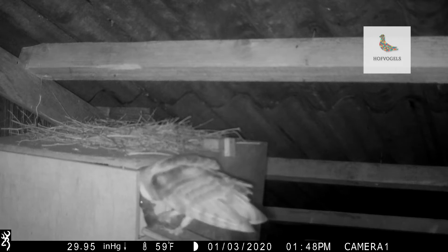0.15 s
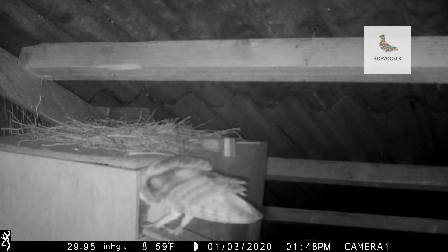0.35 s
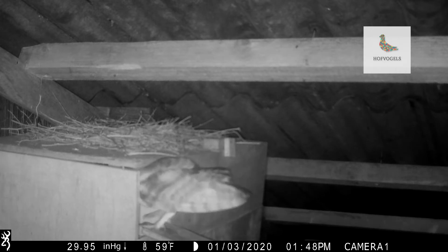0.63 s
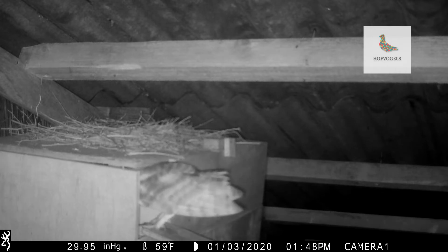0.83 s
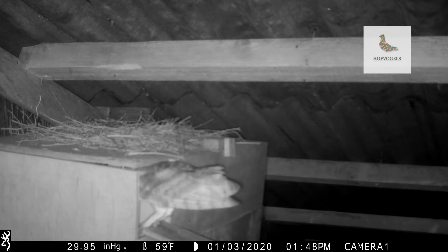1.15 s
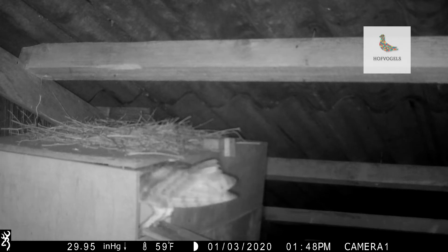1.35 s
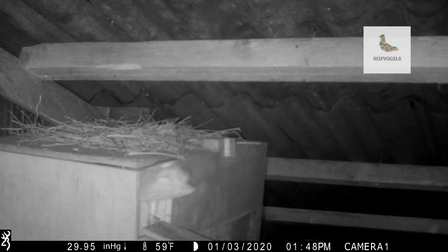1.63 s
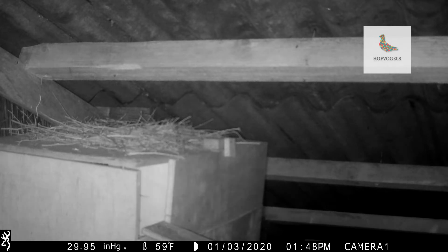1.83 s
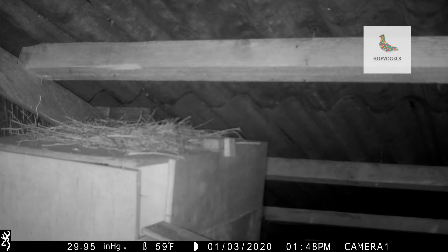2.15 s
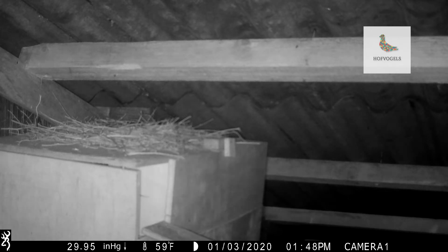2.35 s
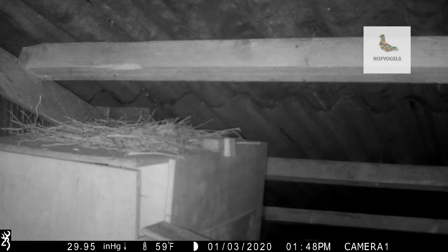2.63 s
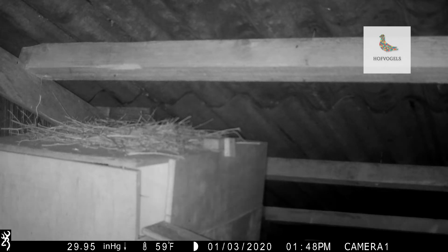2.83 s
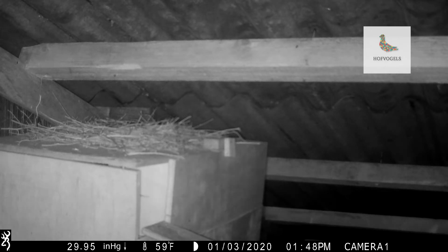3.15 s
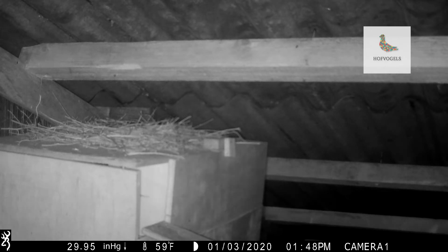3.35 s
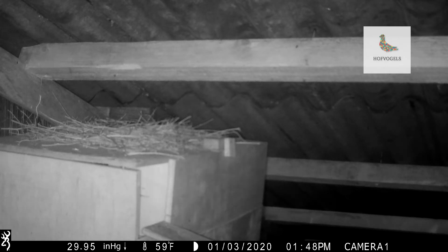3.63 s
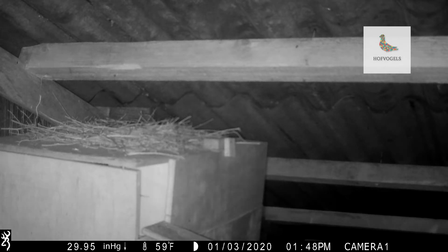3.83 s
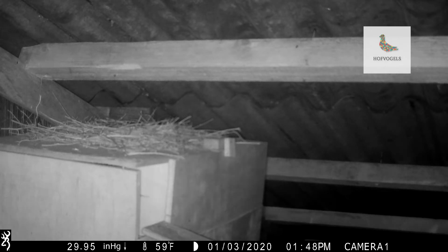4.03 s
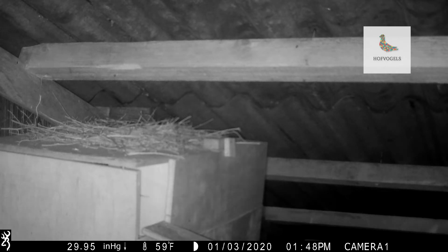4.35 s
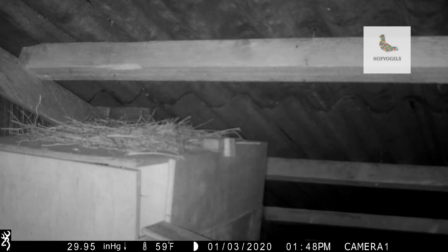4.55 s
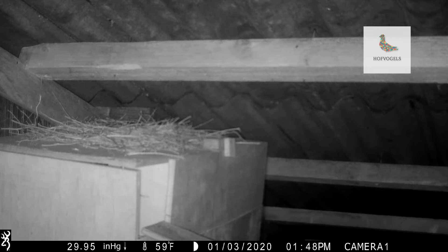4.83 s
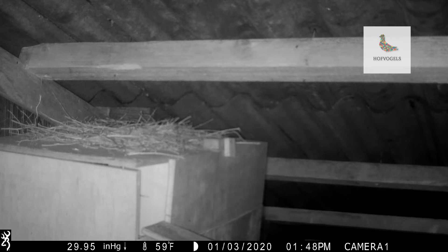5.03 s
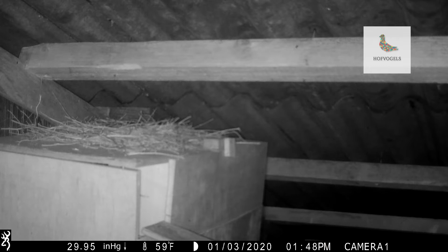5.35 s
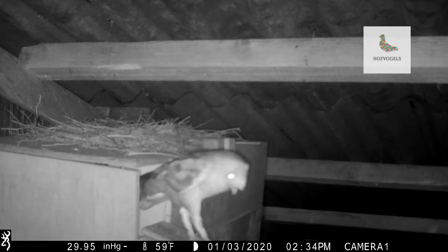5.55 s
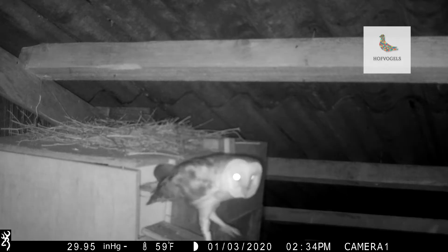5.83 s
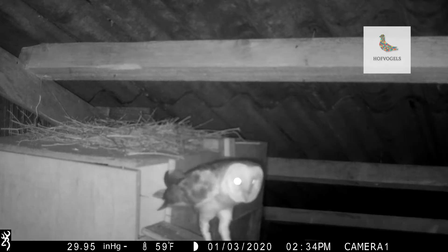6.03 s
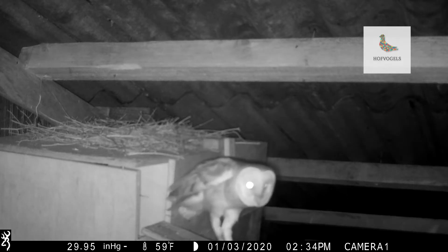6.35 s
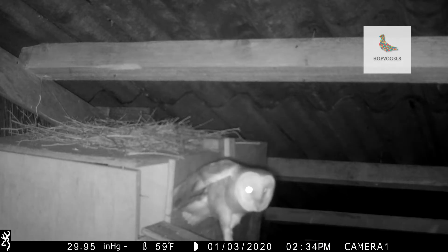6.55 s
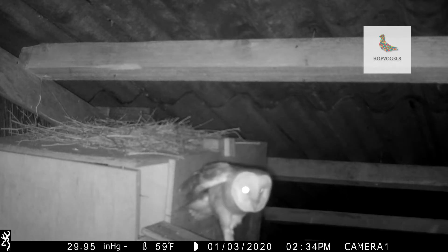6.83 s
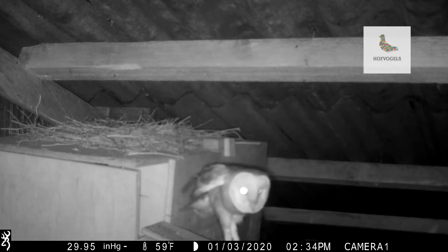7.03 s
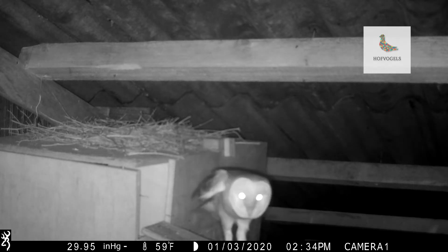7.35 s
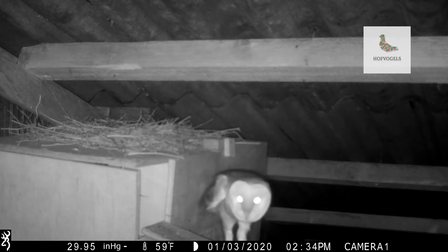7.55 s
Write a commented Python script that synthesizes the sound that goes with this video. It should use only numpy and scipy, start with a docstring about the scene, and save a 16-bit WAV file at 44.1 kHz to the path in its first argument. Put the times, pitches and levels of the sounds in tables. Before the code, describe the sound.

A quiet wooden loft with short, scattered echoes, picked up by a small microphone with steady muffled noise, a very faint high electronic whine and slight buzz. At 0.1 s a barn owl gives a soft, harsh hiss that swells for 0.6 s and stops fast. A much louder, ringing, raspy screech follows at 1.1 s, with a faint talon scratch; a weaker hiss overlaps its end at 1.6 s. Around 1.9 s feet thump lightly on hollow boards. The loudest and longest screech runs from 2.6 to 3.3 s, followed by a brief hiss at 3.35 s and a rougher screech at 3.8 s. Another strong screech starts at 4.9 s and runs into a second bird's at 5.5 s, where a soft pop and one hard, dry bill snap occur. Faint hisses follow at 5.9 and 6.2 s, small scratches near 6.5 s, and a final quieter screech at 7 s.

```python
"""Barn owls in a nest box

Barn owls hiss and screech in a wooden box in a quiet loft at night, at times two at once.
Each screech is noise shaped like air in a throat; most swell slowly, and all stop fast.
Feet thump on ringing boards, a bill snaps and talons scratch, all with echoes of the loft.
Behind them are a soft pop, steady microphone noise and the thin whine and buzz of the camera."""
import sys
import numpy as np
from scipy import signal
from scipy.fft import rfft, irfft
from scipy.io import wavfile

SR = 44100
rng = np.random.default_rng(int(sys.argv[2]) if len(sys.argv) > 2 else 0)


def master_out(mix):
    """Clip the mix to full scale and print it as 16-bit PCM to the path in sys.argv[1]."""
    frames = np.transpose(np.atleast_2d(mix))
    ceiling = np.clip(frames, -1, 1)
    pcm = np.round(ceiling * 32767).astype(np.int16)
    wavfile.write(sys.argv[1], SR, pcm)


N = 339129  # length [samples]

# how each screech is pushed out; the last five run into another one:
# (start [s], length [s], attack [s], time to the crest [s], level at the crest [dB],
#  swell from start to crest [dB], release [s], share of the lower resonances at the crest [dB],
#  rise of that share for each dB of effort under the crest [dB], rush of air [dB],
#  extra treble in the rush [dB])
SCREECHES = [(0.139, 0.64, 0.062, 0.71, -50.5, 12.5, .11, -5, 0.17, -9, 4.5),
             (1.088, 0.61, 0.028, 0.44, -41, 16, 0.16, -10.5, 0.307, -15, 2),
             (2.56, 0.763, 0.038, 0.54, -40, 16.5, 0.11, -6, 0.18, -15.5, 1.5),
             (3.786, 0.62, 0.027, 0.45, -48, 14.5, 0.097, -3.5, 0.2535, -5.5, 1.5),
             (4.87, 0.59, 0.043, .48, -45.5, 16, 0.018, -4.5, 0, -10, 2.5),
             (6.97, 0.66, 0.094, .43, -50, 12, 0.095, -5.5, 0.38, -11.5, 3.5),
             (1.574, 0.38, .025, 0.18, -52, -1.3, .1, -0.5, 0, -10.5, 2),
             (3.352, 0.21, .025, 0.16, -52, -0.5, 0.077, -4, 0, -14, 7),
             (5.464, 0.46, .01, 0.35, -45, 7, 0.12, -6, 0.3658, -10, -1),
             (5.94, 0.28, 0.023, .1, -61.5, -0.1, 0.17, 1.5, 0, -7, 4),
             (6.219, 0.36, .05, .3, -57.5, 3.5, 0.058, -2.5, 0.17, -6, -1)]
# resonances of throat and box, one list a screech, as each bird sits and gapes differently:
# (frequency [Hz], width [Hz], level [dB])
THROAT_RESONANCES = [
    [(2520, 60, -3), (2950, 120, -4), (3660, 120, 1.5), (3990, 20, 6.5), (4170, 51, 0.5), (4520, 42, 1.5),
     (4740, 50, -2), (5310, 280, -13.5)],
    [(2210, 28, -19), (2400, 320, -10), (2730, 24, -5.5), (3180, 46, -6.5), (3667, 130, 1), (4056, 41, 1),
     (4270, 49, -21)],
    [(2376, 210, -5.5), (2890, 50, -18), (3260, 15, -9), (3710, 120, -3), (4310, 95, -13.5),
     (5230, 27, -27), (5960, 190, -38)],
    [(1464, 48, 1), (2020, 240, 1), (2324, 25, 2.5), (2700, 59, -5), (2880, 150, -3.5), (3200, 21, -17),
     (3540, 85, -2), (3830, 28, -15), (4250, 18, 0), (4430, 97, -2), (4760, 42, -4.5), (5200, 280, -16)],
    [(1454, 32, -11), (2365, 200, -2), (3110, 110, -21), (3600, 23, -12), (3850, 120, 1), (4530, 28, -10),
     (5240, 66, -18), (5100, 40, -13)],
    [(2080, 41, -10), (2374, 99, -3), (2910, 110, -10), (3810, 170, 0), (4330, 100, -1), (4580, 32, -1),
     (4870, 40, -14), (5390, 68, -17)],
    [(1430, 37, -6), (2020, 140, -8.5), (2360, 100, -3), (2680, 37, -5), (3010, 74, -3), (4040, 45, -4),
     (4230, 40, -6), (4680, 65, -16)],
    [(2070, 110, -10), (2364, 62, -8), (3120, 34, -8), (3585, 37, 2), (3790, 47, 0), (4100, 64, -4),
     (4300, 76, -14)],
    [(2070, 91, -11), (2300, 82, -6), (2630, 19, -4), (2900, 85, -8.5), (3040, 57, -8), (3730, 57, -1.5),
     (4100, 95, -1), (5100, 49, -24), (5400, 130, -22)],
    [(1300, 100, -4), (2470, 45, -2.5), (2740, 29, -2), (3250, 31, -1), (3460, 33, 3), (3800, 63, 1),
     (4270, 42, -6)],
    [(2460, 77, 0), (2860, 23, -1), (3480, 26, 4), (3740, 130, 0), (4360, 36, -5)],
]


def owls():
    """All screeches, each sounding through its own resonances of throat and box."""
    out = np.zeros(N)
    for row, throat in zip(SCREECHES, THROAT_RESONANCES):
        start, sound = screech(row, throat)
        add(out, start, sound)
    return out


# broad rush of air under the resonances of every screech: (frequency [Hz], level [dB])
AIR_RUSH = [(600, -28), (1200, -12.5), (1450, -7.5), (1750, -10.5), (2350, -4), (2900, -4.5), (3700, 3.5),
            (4400, 1.5), (5150, -16.5), (5450, -20), (6000, -27.5), (6800, -35.5), (9900, -31),
            (11200, -47.5), (14500, -54)]


def screech(row, throat):
    """Turbulent air sounds the throat; resonances stand out as effort grows; the jet rasps and trembles."""
    split_hz, treble_hz = 2900, 5000  # lower from upper resonances; start of the extra treble
    slack = 0.1  # power of the resonances in a slack throat, as a share of a tense one
    focus = 0.29  # dB of tension lost for each dB of effort under its highest
    rasp, rasp_hz = 0.033, 190  # depth and speed of the rough flutter
    tremor_db, tremor_hz = 0.06, 28  # depth and speed of the slower tremble
    (start, length, attack_s, crest_s, crest_db, swell_db, release_s,
     share_db, lead, rush_db, treble_db) = row

    t, effort_db = effort(length, crest_s, swell_db, release_s)
    lower_db = share_db - lead * effort_db
    hz = np.fft.rfftfreq(len(t), 1 / SR)

    # steep-sided resonances stand on the broad rush
    peaks = sum(amp(db) ** 2 / (1 + ((hz - f) / width) ** 2) ** 2 for f, width, db in throat)
    rush_gain = amp(rush_db + treble_db * (hz > treble_hz))
    rush = rush_gain * spectrum(AIR_RUSH, hz) * box_echoes(hz)

    def jet(colour):
        """Air noise in the upper resonances, plus a changing share of the lower ones."""
        upper = noise(len(t), lambda hz: colour * (hz >= split_hz))
        lower = noise(len(t), lambda hz: colour * (hz < split_hz))
        return upper + amp(lower_db) * lower

    # a slack throat gives a plain hiss, a tense one a ringing screech
    tension = np.clip(amp(focus * (effort_db - effort_db.max())), 0, 1)
    ringing = jet(np.sqrt(peaks + rush ** 2))
    hissing = jet(np.sqrt(slack * peaks + rush ** 2))
    voice = tension * ringing + np.sqrt(1 - tension ** 2) * hissing

    flutter = 1 + rasp * noise(len(t), lambda hz: np.exp(-(hz / rasp_hz) ** 2))
    tremor = tremor_db * noise(len(t), lambda hz: np.exp(-(hz / tremor_hz) ** 2))
    fade_in = np.minimum(t / attack_s, 1)
    loudness = amp(crest_db + effort_db + tremor)
    return start, fade_in * loudness * flutter * voice


RELEASE_DB = 27.5  # fall of the effort over one release time


def effort(length, crest_s, swell_db, release_s):
    """A push of air follows an arch around its crest, then stops fast; gives time and dB beside the crest."""
    t = np.arange(0, length + 2 * release_s, 1 / SR)
    arch = swell_db * (1 - np.minimum(t, length) / crest_s) ** 2
    release = RELEASE_DB * np.maximum(t - length, 0) / release_s
    return t, -arch - release


def box_echoes(hz, count=10, echo=0.23):
    """First echoes off the box walls add to the sound or cancel it, leaving a comb of ridges over pitch."""
    delay_s = rng.uniform(0.00099, 0.012, count)
    size = echo * rng.choice([-1., 1.], count)
    comb = abs(1 + np.exp(-2j * np.pi * hz[:, None] * delay_s) @ size)
    return comb / np.sqrt(1 + count * echo ** 2)


# bill snap, with a faint click before it and its first echoes off the box: (time [s], level [dB])
BILL_SNAPS = [(5.5135, -46), (5.5151, -23), (5.5170, -42), (5.519, -43), (5.5213, -40)]
# ring of the bill when it snaps: (frequency [Hz], level [dB], time to fall by 60 dB [s])
BILL_RING = [(1780, -13.5, 0.036), (2200, -4, 0.018), (2630, -5, 0.014), (3490, 4, 0.0093),
             (3990, -1, 0.013), (3830, -7, 0.02)]


def bill():
    """A hard, very short clack: the struck bill rings in a few tones that die at once."""
    out = np.zeros(N)
    for s, db in BILL_SNAPS:
        add(out, s, amp(db) * ring(BILL_RING))
    return band(out, 1680, 5000, order=7)


# feet landing on the box: (time [s], level [dB])
FOOTSTEPS = [(1.863, -53.5), (1.872, -61), (1.884, -54.5), (1.911, -61), (2.016, -61)]
# ring of the box boards: (frequency [Hz], level [dB], time to fall by 60 dB [s])
BOARD_RING = [(123, -3, 0.24), (171, 1, 0.082), (251, -4, .08), (360, -0.5, 0.048), (503, 0.5, 0.066),
              (686, 0, .045), (910, -2, 0.042)]
# talons scratching wood: (time [s], level [dB], time to fall by 60 dB [s])
TALON_SCRATCHES = [(1.102, -47, 0.028), (1.59, -48.5, 0.31), (4.834, -58.5, .06), (6.448, -47.5, 0.049),
                   (6.564, -50, 0.056)]
# colour of a talon scratch: (frequency [Hz], level [dB])
SCRATCH_COLOUR = [(300, -10), (1000, -5), (1800, 1), (3200, -3), (4400, -7), (6000, -28)]


def feet():
    """Steps ring the boards; talons leave short dry scratches of fading noise."""
    out = np.zeros(N)
    for s, db in FOOTSTEPS:
        add(out, s, amp(db) * ring(BOARD_RING))
    t = np.arange(SR // 8) / SR
    for s, db, t60 in TALON_SCRATCHES:
        scrape = noise(len(t), lambda hz: spectrum(SCRATCH_COLOUR, hz))
        add(out, s, amp(db - 60 * t / t60) * scrape)
    return band(out, 100, 5500, order=4)


def loft(x, wet_db, t60=0.2):
    """Box, rafters and roof scatter the sound into many echoes, which fall by 60 dB in t60 seconds."""
    t = np.arange(SR // 2) / SR
    signs = rng.choice([-1., 1.], len(t))
    chosen = rng.random(len(t)) < 2500 / SR  # about 2500 echoes a second
    taps = signs * chosen * (t > .003)
    tail = taps * amp(-60 * t / t60)
    echoes = signal.fftconvolve(x, tail / np.linalg.norm(tail))[:N]
    return x + amp(wet_db) * echoes


# a soft low pop: (time [s], level [dB])
SOFT_POP = (5.462, -37)


def pop():
    """One pulse that rises and falls evenly within about a millisecond."""
    t = np.arange(N) / SR
    pop_s, pop_db = SOFT_POP
    return amp(pop_db) * np.exp(-abs(t - pop_s) / 0.00023)


# colour of the steady microphone noise: (frequency [Hz], level [dB])
FLOOR_COLOUR = [(25, -22), (70, -14), (150, -8.5), (300, -5.5), (500, -3.5), (800, -2), (1100, -4),
                (1500, -5.5), (2000, -8.5), (3000, -14.5), (4100, -22.5), (5000, -34), (6000, -47),
                (7200, -54)]
FLOOR_DB = -58.5


def microphone_noise():
    """Steady noise with little treble, plus a much fainter hiss that is even up to about 12.5 kHz."""
    hiss_db, hiss_hz = -88.5, 12500
    floor = amp(FLOOR_DB) * noise(N, lambda hz: spectrum(FLOOR_COLOUR, hz))
    hiss = amp(hiss_db) * noise(N, lambda hz: 1 / (1 + (hz / hiss_hz) ** 14))
    return floor + hiss


WHINE_HZ, FRAME_HZ = 7796.2, 29.74  # pitch of the whine; picture frames a second


def camera_whine():
    """A thin tone flips its phase twice in each picture frame; a tick at every flip makes a faint buzz."""
    whine_db, octave_db = -74.5, -95
    lopsided = 0.24  # makes the tone stronger in one half of the frame than in the other
    tick_db, tick_hz = -51, 5000  # tick level before its band is cut out
    t = np.arange(N) / SR
    flips = np.sign(np.sin(2 * np.pi * FRAME_HZ * (t - .0135)))
    turn = 2 * np.pi * WHINE_HZ * t
    whine = amp(whine_db) * (flips + lopsided) * np.sin(turn)
    octave = amp(octave_db) * np.sin(2 * turn)
    ticks = abs(np.gradient(flips))
    buzz = amp(tick_db) * band(ticks, tick_hz / 2, 1.21 * tick_hz, order=2)
    return whine + octave + buzz


def amp(db):
    """Decibels to gain."""
    return 10 ** (np.asarray(db) / 20)


def unit(x):
    """Scales to rms 1."""
    return x / np.sqrt(np.mean(x ** 2) + 1e-20)


def spectrum(points, hz):
    """Gain read from a (frequency [Hz], level [dB]) table, with straight lines over log frequency."""
    f, db = np.transpose(points)
    return amp(np.interp(np.log(hz + 1), np.log(f + 1), db))


def noise(size, colour):
    """Noise of rms 1 whose spectrum follows the function colour(Hz)."""
    white = rfft(rng.standard_normal(size))
    return unit(irfft(white * colour(np.fft.rfftfreq(size, 1 / SR)), size))


def add(mix, s, sound):
    """Mixes a sound in at time s [s]."""
    part = mix[round(s * SR):][:len(sound)]
    part += sound[:len(part)]


def ring(modes):
    """A struck object shakes in several tones, each dying away at its own pace."""
    t = np.arange(SR // 4) / SR
    return sum(amp(db - 60 * t / t60) * np.sin(2 * np.pi * hz * t) for hz, db, t60 in modes)


def band(x, low_hz, high_hz, order):
    """Keeps one band, without delaying it."""
    sos = signal.butter(order, [low_hz, high_hz], btype="band", fs=SR, output="sos")
    return signal.sosfiltfilt(sos, x)


def scene():
    """The birds in the loft, heard by one small microphone; the bill snaps in the open, so it is drier."""
    birds = loft(owls() + feet(), wet_db=-11.5)
    snap = loft(bill(), wet_db=-17.5)
    background = pop() + microphone_noise() + camera_whine()
    return (birds + snap + background)[None]


EDGE_HZ = 15750  # top edge of the treble


def record(dry):
    """A steep low-pass leaves no treble above about 15.75 kHz."""
    lowpass = signal.firwin(1023, EDGE_HZ, window=("kaiser", 9), fs=SR)
    return signal.oaconvolve(dry, lowpass[None], "same")


dry = scene()
out = record(dry)
master_out(out)
```